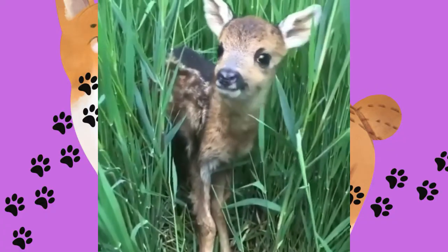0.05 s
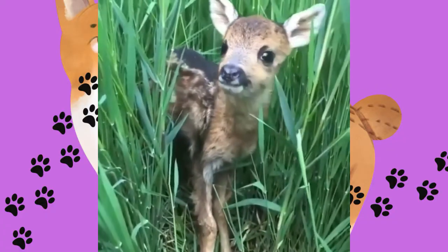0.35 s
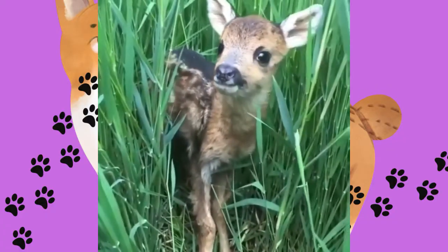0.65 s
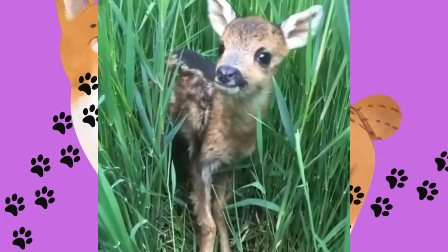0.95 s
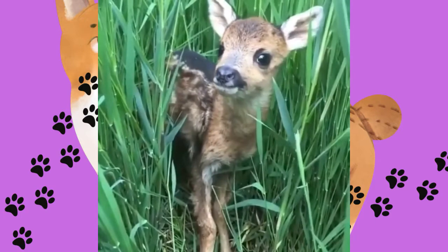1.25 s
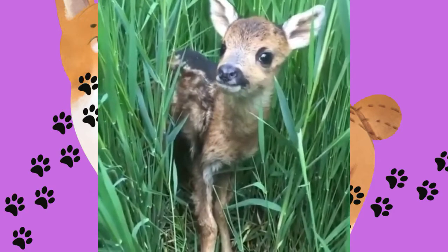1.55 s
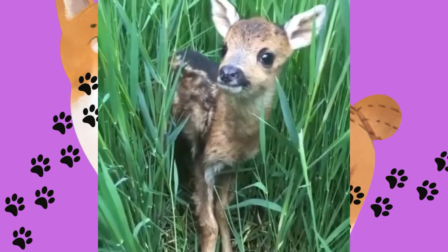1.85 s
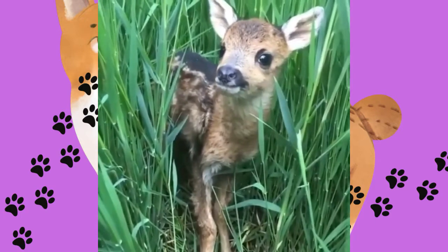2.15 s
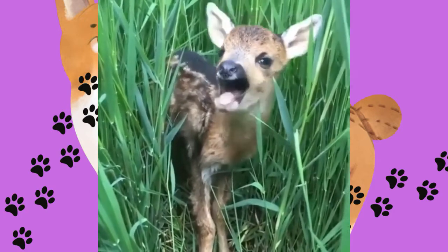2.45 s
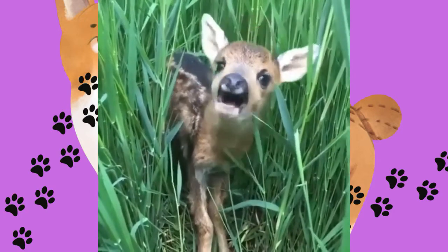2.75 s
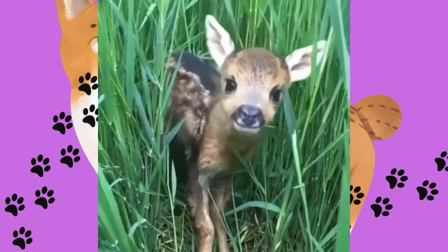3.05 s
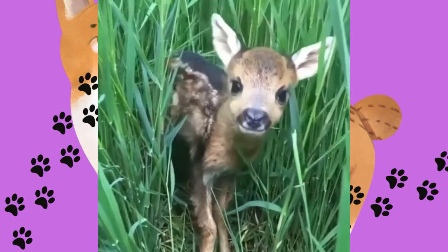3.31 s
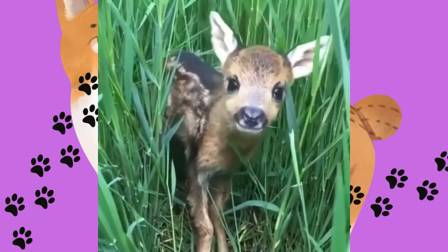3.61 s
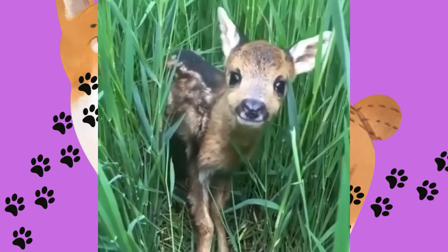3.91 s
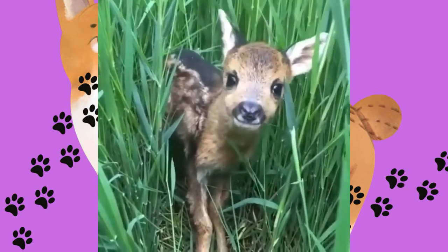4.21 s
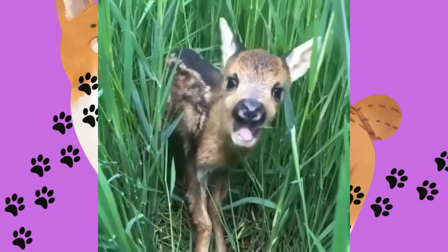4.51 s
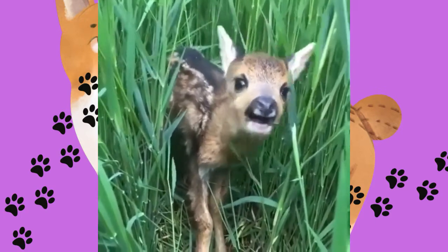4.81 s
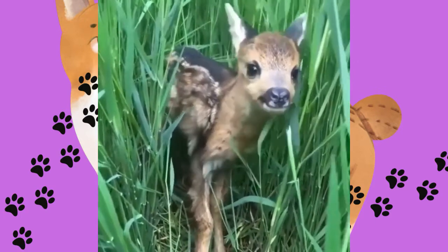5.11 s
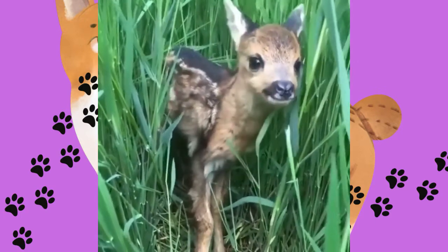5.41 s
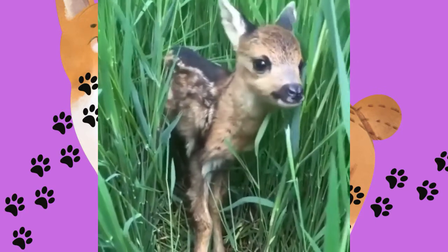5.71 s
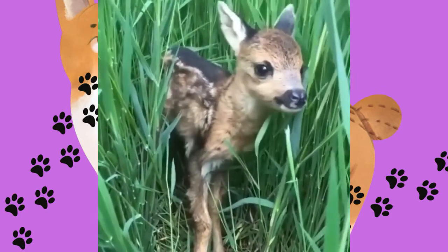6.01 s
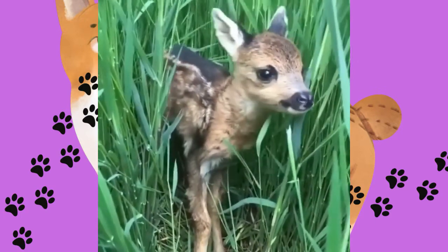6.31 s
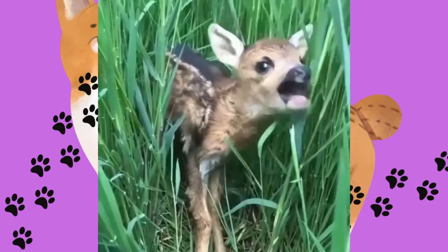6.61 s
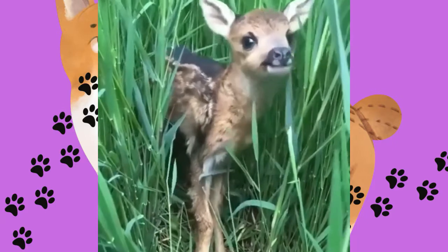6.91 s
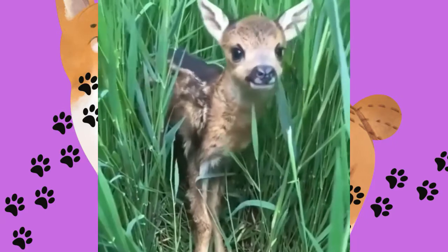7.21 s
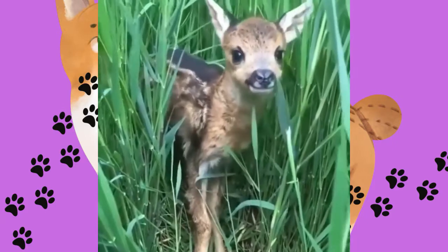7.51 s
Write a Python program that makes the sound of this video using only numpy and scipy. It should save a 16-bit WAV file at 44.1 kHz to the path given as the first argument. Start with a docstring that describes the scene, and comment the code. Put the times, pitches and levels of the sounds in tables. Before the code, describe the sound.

Three thin, piercing bleats from a young deer close by, each breaking into a rasp, with faint outdoor hiss behind.

```python
"""Low outdoor rumble and hiss open the scene; a far bird chirps once and others peep faintly.
From 2.3 s a fawn in tall grass, close by, gives three thin bleats: vocal folds sounding through
its throat. Each starts as a soft squeak, opens into a clear arch of pitch, then drops an octave into
a rasp and croaks shut. Steady, piercing high tones sound during the bleats; the background ducks and
creeps back. After the first bleat the grass keeps stirring; after the last, rumble and hiss swell."""
import sys
import numpy as np
from scipy import signal
from scipy.fft import rfft, irfft, next_fast_len
from scipy.io import wavfile
from scipy.ndimage import uniform_filter1d, minimum_filter1d

SR = 44100
rng = np.random.default_rng(int(sys.argv[2]) if len(sys.argv) > 2 else 0)


def persist_wave(psi):
    """Save psi, clipped to +-1, as 16-bit WAV."""
    counts = np.round(np.clip(psi, -1, 1) * 32767).astype(np.int16)
    wavfile.write(sys.argv[1], SR, np.atleast_2d(counts).T)


N = 341775
TIME = np.arange(N) / SR

# colour of the low outdoor rumble: f/Hz, level/dB
RUMBLE_COLOUR = [(12, -47), (20, -20.5), (47, -1), (70, 2), (95, -4), (167, -13), (212, -14.5), (263, -23),
                 (350, -32.5), (460, -53.5), (770, -120)]
# colour of the hiss of air and grass: f/Hz, level/dB
HISS_COLOUR = [(180, -29.5), (300, -2.5), (420, -7), (999, -2), (1690, -13), (2710, -16.5), (4800, -22),
               (6160, -20), (7680, -21.5), (10000, -36.5), (13000, -68.5), (22000, -120)]
# swells of rumble and hiss: t/s, added share/dB, half-width/s
AIR_SWELLS = [(4.2, -11.5, .4), (7.195, -1, .45)]
# brushes of grass: t/s, level/dB, half-width/s
GRASS_BRUSHES = [(1.698, -81, .06), (3.444, -71, 0.059), (3.96, -86, 0.32), (5.83, -83, 0.12)]
# colour of rustling grass: f/Hz, level/dB
GRASS_COLOUR = [(1000, -12.5), (2500, -6), (4000, -4.5), (5800, -3), (7200, -6.5), (9000, -8), (10000, -29)]
# peeps of the farthest birds: t/s, f/Hz, level/dB, half-width/s
FAR_PEEPS = [(.38, 2880, -73.5, .016), (.888, 2780, -74.5, 0.0076), (1.01, 2830, -73, 0.014),
             (1.386, 2710, -73.5, 0.028), (1.916, 2780, -78, 0.027), (2.875, 2200, -53.5, 0.0084),
             (6.354, 2720, -71.5, 0.018)]
# notes of one bird's chirp: t/s, f/Hz, relative level/dB, half-width/s
CHIRP_NOTES = [(0.408, 6800, -62.5, 0.026), (.423, 6940, -46.5, 0.0018), (.458, 6470, -53, 0.022),
               (0.5, 7500, -63, 0.011)]
# steady, piercing high tones that sound during the bleats:
# start/s, fade from/s, stop/s, f/Hz, level/dB, fade by the stop/dB
STEADY_HIGH_TONES = [ (2.388, 2.410, 2.412, 6718, -20, 0), (2.412, 2.434, 2.482, 6718, -14, -22),
                     (4.502, 4.660, 4.735, 7063, -14.5, -11), (4.502, 4.518, 4.525, 9819, -28, -2),
                     (4.590, 4.780, 4.830, 9819, -56, 0), (4.765, 4.810, 4.825, 7063, -37, -3),
                     (6.462, 6.670, 6.765, 9130, -24, -20), (6.480, 6.720, 6.780, 9819, -47, -3),
                     (6.493, 6.590, 6.688, 7063, -14.5, -8)]
# last catches of the voice as the throat closes: t/s, level/dB, decay/s
THROAT_CATCHES = [(2.806, -34.5, 0.0091), (4.842, -40, 0.0095), (4.857, -35, 0.0078), (6.785, -32, .008),
                  (6.801, -29.5, .003), (6.812, -28, 0.0053)]
# colour of the air in a catch: f/Hz, level/dB
CATCH_COLOUR = [(150, -27), (500, -11.5), (850, 6), (1300, -3), (1900, 8), (2800, -13.5), (4500, -13.5),
                (9000, -18.5)]
# throat resonances rung by a catch: f/Hz, relative level/dB
CATCH_MODES = [(900, -8), (1920, -4)]
# how throat and mouth shape the harmonics: f/Hz, gain/dB
THROAT_GAIN = [(800, -9), (1300, -3.5), (1750, 1), (1920, 4), (2600, -2), (3050, -2.5), (3550, -5),
               (3950, 10.5), (4400, 3.5), (4700, -2.5), (5350, -1), (5800, -3.5), (6250, 5.5), (6550, 6)]
# colour of the faint turbulence in the clear voice: f/Hz, level/dB
BREATH_COLOUR = [(200, -17.5), (900, -19), (1500, -7), (2300, -25.5), (2750, -10), (3700, -12), (4400, -2),
                 (5900, -11), (6400, 0.5), (7200, 7), (8100, -33.5), (8900, -7), (10000, -23.5)]
# colour of the rasp as the voice breaks: f/Hz, level/dB
RASP_COLOUR = [(200, -35), (700, -36), (1100, -11), (1800, -15.5), (2600, -6.5), (3400, -10.5),
               (4100, -1.5), (5200, -13), (6400, 1.5), (7400, -13), (8200, 1), (9200, 3.5), (10000, -14)]
# the bleats: start/s, mouth opens/s, effort fades from/s, voice breaks/s, end/s, top pitch/Hz, rise/s,
# sag/(Hz/s), level trim/dB, fundamental's loss by the break/dB, rasp trim/dB,
# lower and upper gliding tone against the overtones/dB
FAWN_BLEATS = [(2.32, 2.367, 2.500, 2.729, 2.827, 1796, .174, 598, 0.25, -13, -0.5, 0, -26),
               (4.437, 4.467, 4.605, 4.774, 4.876, 1786, .114, 484, -0.5, -14.5, -1.5, -17.5, -16.5),
               (6.411, 6.442, 6.585, 6.711, 6.810, 1780, 0.13, 416, 0, -11.5, 1, -18.5, -29.5)]

BREAK_S, RELEASE_S = .0139, .027   # time constant of the octave drop; time the throat takes to close


def from_db(db):
    """Decibels to gain."""
    return 10 ** (np.asarray(db) / 20)


def rms_one(x):
    """Scale to unit power."""
    return x / np.sqrt(np.mean(x ** 2) + 1e-20)


def at_hz(points, hz):
    """Gain of a colour curve at the given frequencies."""
    f, db = np.transpose(points)
    return from_db(np.interp(np.log(hz + 1e-9), np.log(f), db))


def noise(colour, size=N, gate=1):
    """Noise, gated at its source and then coloured, rms 1."""
    padded = next_fast_len(size)
    hz = np.arange(padded // 2 + 1) * SR / padded
    spectrum = rfft(gate * rng.standard_normal(size), padded)
    return rms_one(irfft(spectrum * at_hz(colour, hz), padded)[:size])


def drift(rate_hz, size=N):
    """Smooth random wobble up to a given rate, rms 1."""
    sos = signal.butter(2, min(rate_hz, SR / 4), fs=SR, output="sos")
    return rms_one(signal.sosfilt(sos, rng.standard_normal(size + SR))[SR:])


def phase_of(hz):
    """Running phase of a pitch curve."""
    return 2 * np.pi * np.cumsum(hz) / SR


def tone(phase):
    """Sine of rms 1 with a random starting phase."""
    return np.sqrt(2) * np.sin(phase + rng.uniform(0, 2 * np.pi))


def ramp(t, start, length):
    """Straight rise from 0 to 1."""
    return np.clip((t - start) / length, 0, 1)


def swell(peak_s, db, width_s, t=TIME):
    """A bell-shaped rise and fall in gain around one moment."""
    return from_db(db) * np.exp(-np.minimum(((t - peak_s) / width_s) ** 2, 50))


def scattered(x, t60, wet_db):
    """Vegetation adds a diffuse, dying tail."""
    tail = rng.standard_normal(SR) * from_db(-60 * TIME[:SR] / t60)
    tail /= np.sqrt(np.sum(tail ** 2))
    return x + from_db(wet_db) * signal.fftconvolve(x, tail)[:N]


def outdoor_bed(rumble_db=-52.5, hiss_db=-66, hum_db=-66, hum_hz=209):
    """Low rumble and a soft hiss of air and grass swell together over a far, wavering hum."""
    swells = 1 + sum(swell(*row) for row in AIR_SWELLS)
    rumble = from_db(rumble_db + 1.5 * drift(11)) * noise(RUMBLE_COLOUR)
    hiss = from_db(hiss_db) * noise(HISS_COLOUR)
    early_db = -7.5 * (1 - ramp(TIME, 3.38, .62))   # the hum is fainter at first
    hum = from_db(hum_db + early_db) * tone(phase_of(hum_hz + 3 * drift(3.8)))
    return swells * (rumble + hiss) + hum


def grass(stir_from_s=3.44, stir_db=-72, flicker_db=2):
    """Grass rustles in a few soft brushes and, partway through, starts to stir steadily."""
    stirring = from_db(stir_db) * ramp(TIME, stir_from_s, .18)
    brushes = sum(swell(*row) for row in GRASS_BRUSHES)
    return (stirring + brushes) * from_db(flicker_db * drift(25)) * noise(GRASS_COLOUR)


def far_peeps(warble_hz=60):
    """The farthest birds give faint, warbling blips."""
    warble = warble_hz * drift(112)
    return sum(swell(s, db, width) * tone(phase_of(hz + warble)) for s, hz, db, width in FAR_PEEPS)


def bird_chirp(warble_hz=380, trim_db=-2):
    """One high chirp, made buzzy by a fast warble and blurred by distance."""
    warble = warble_hz * drift(590)
    chirp = sum(swell(s, db + trim_db, width) * tone(phase_of(hz + warble))
                for s, hz, db, width in CHIRP_NOTES)
    return scattered(chirp, t60=.51, wet_db=-.5)


def ducking(foreground, threshold_db=-27, depth_db=13, hold_s=.3, release_db_per_s=22):
    """Background gain that drops while the foreground is loud, holds, then creeps back."""
    level_db = 10 * np.log10(np.abs(uniform_filter1d(foreground ** 2, size=441)) + 1e-12)
    cut_db = np.clip(level_db - threshold_db, 0, depth_db)
    half = int(hold_s * SR / 2)
    held_db = -minimum_filter1d(-cut_db, 2 * half + 1, origin=half)
    recovery_db = release_db_per_s * TIME
    return from_db(recovery_db - np.maximum.accumulate(held_db + recovery_db))


def steady_high_tones(edge_s=.0052, waver_db=1):
    """Piercing tones of steady pitch that snap in, hold and fade."""
    out = np.zeros(N)
    for start, fades, stop, hz, level_db, fade_db in STEADY_HIGH_TONES:
        gate = np.clip(np.minimum(TIME - start, stop - TIME) / edge_s + .5, 0, 1)
        on = gate > 0
        edges = np.sin(gate[on] * np.pi / 2) ** 2
        level = from_db(level_db + fade_db * np.interp(TIME[on], [fades, stop], [0, 1]))
        out[on] += edges * level * np.sqrt(2) * np.sin(2 * np.pi * hz * TIME[on])
    return out * from_db(waver_db * drift(37))


def croaks(air_db=-4):
    """Each catch of the voice is a short burst of air that sets the throat ringing."""
    out = np.zeros(N)
    air = from_db(air_db) * noise(CATCH_COLOUR)
    for s, db, decay in THROAT_CATCHES:
        on = (TIME >= s) & (TIME < s + 10 * decay)
        age = TIME[on] - s
        ring = sum(from_db(mode_db) * np.sin(2 * np.pi * hz * age) for hz, mode_db in CATCH_MODES)
        out[on] += from_db(db) * np.exp(-age / decay) * (ring + air[on])
    return out


def gliding_tones(t, moments, phase, rough, lower_db, upper_db, shift_hz=5512):
    """Thin tones ride above the first three harmonics; the third comes in with roughness."""
    _, opens, _, breaks, _ = moments
    # the lower tone swells in and leaves just ahead of the break
    lower = from_db(lower_db - 20.5 * (1 - ramp(t, opens, .09)))
    lower /= 1 + np.exp((t - breaks) / BREAK_S + 2)
    # the upper pair flares at the opening and at the break
    upper = from_db(upper_db) + swell(opens + .011, -8, .0053, t) + swell(breaks, -9, .022, t)
    first, second, third = (tone(k * phase + 2 * np.pi * shift_hz * t) for k in (1, 2, 3))
    return lower * first + upper * (second + rough * third)


def turbulence(phase, harsh, pulsing=.18, breath_db=-2):
    """Air puffs once for each opening of the folds; breath broadens into rasp as the voice harshens."""
    puffs = 1 + pulsing * np.cos(phase)
    rasp = noise(RASP_COLOUR, len(phase), puffs)
    breath = from_db(breath_db) * noise(BREATH_COLOUR, len(phase), puffs)
    return np.sqrt(harsh) * rasp + np.sqrt(1 - harsh) * breath


def bleat_pitch(t, moments, top_hz, rise_s, sag_hz_per_s,
                squeak_hz=1880, fall_hz=448, climb_hz=282, broken_hz=908):
    """A falling squeak, a climb to the top, a slow sag, then a break to the octave below."""
    start, opens, _, breaks, end = moments
    squeak = squeak_hz - fall_hz * np.sqrt(ramp(t, start, opens - start))
    to_top = opens + rise_s - t
    still_to_climb = climb_hz * (np.maximum(to_top, 0) / rise_s) ** 2.37
    arch = top_hz - still_to_climb + sag_hz_per_s * np.minimum(to_top, 0)
    held = (1 + np.exp((t - breaks) / BREAK_S)) ** -.95
    broken = broken_hz * (1 - .34 * ramp(t, end - RELEASE_S, RELEASE_S))   # droops as the throat closes
    return held * np.maximum(squeak, arch) + (1 - held) * broken


def bleat_levels(t, moments, trim_db, loss_db, rasp_trim_db, attack_s, opening_s=.009, shut_db=-34.5):
    """Fundamental, overtones and rasp in dB: soft until the mouth opens, then following the effort."""
    start, opens, fades, breaks, end = moments
    opened = ramp(t, opens - opening_s, opening_s)
    shut = 1 - ramp(t, start - attack_s / 2, attack_s) + ramp(t, end - RELEASE_S, RELEASE_S)
    spent = ramp(t, fades, breaks - fades)
    before_break, after_break = np.maximum(breaks - t, 0), np.maximum(t - breaks, 0)
    # a 1 dB push opens the call, then the level dips briefly
    push_s = opens + .012
    effort_db = trim_db + swell(push_s, 0, .013, t) - 2.5 * swell(opens + .035, 0, .038, t)
    first_db = -21.5 + effort_db + loss_db * spent
    over_db = -19 + effort_db - 7 * spent - 370 * after_break
    # a burst of rasp clears to faint grit; a second burst peaks at the break
    opening_rasp_db = np.maximum(-34.5 - 190.5 * np.abs(t - push_s), -48.5)
    break_rasp_db = -29.5 - 202.5 * before_break
    rasp_db = rasp_trim_db + np.maximum(opening_rasp_db, break_rasp_db) - 310.5 * after_break
    # each layer crossfades from its growing squeak level to its open-mouth level
    growth_db = 161 * (t - opens)
    return [(1 - opened) * (squeak_db + growth_db) + opened * open_db + shut_db * shut
            for squeak_db, open_db in ((-33, first_db), (-58, over_db), (-50, rasp_db))]


def bleat(row, attack_s=.008, waver_hz=32, jitter=.026, shimmer=.35, jitter_hz=300,
          harsh_from=.19, lag_s=.0035, ceiling_hz=6580):
    """Vocal folds sound through the throat; they grow unsteady as the rasp nears the voice's level."""
    *moments, top_hz, rise_s, sag_hz_per_s, trim_db, loss_db, rasp_trim_db, lower_db, upper_db = row
    start, _, fades, breaks, end = moments
    span = (TIME >= start - attack_s / 2) & (TIME <= end)
    t = TIME[span]
    size = len(t)
    pitch = bleat_pitch(t, moments, top_hz, rise_s, sag_hz_per_s) * (1 + .0007 * drift(waver_hz, size))
    wavering_db = trim_db + .8 * drift(waver_hz, size)
    first_db, over_db, rasp_db = bleat_levels(t, moments, wavering_db, loss_db, rasp_trim_db, attack_s)
    rough = np.minimum(from_db(rasp_db - np.maximum(first_db, over_db)), 1)
    harsh = rough ** 6 / (rough ** 6 + harsh_from ** 6)   # soft switch from clear to raspy
    unsteady = np.sqrt(rough * harsh)
    phase = phase_of(pitch * (1 + jitter * unsteady * drift(jitter_hz, size)))
    # softly closing folds lose their highest harmonics first; fading effort dulls them further
    tilt_db = .3 * np.minimum(over_db - first_db, 0)
    dull_db = -2.5 * ramp(t, fades, breaks - fades)
    voice = 0
    for k in range(1, 8):
        # each overtone opens a little after the one below
        late_db = np.minimum(over_db, np.interp(t - (k - 2) * lag_s, t, over_db))
        harmonic_db = first_db if k == 1 else late_db + (k - 3.5) * tilt_db + (k - 1.5) * dull_db
        below_ceiling = np.clip((ceiling_hz - k * pitch) / 100, 0, 1)
        level = from_db(harmonic_db) * at_hz(THROAT_GAIN, k * pitch) * below_ceiling
        voice += level * tone(k * phase) * (1 + shimmer * unsteady * drift(jitter_hz, size))
    glides = gliding_tones(t, moments, phase, rough, lower_db, upper_db)
    voice += from_db(over_db) * glides * (1 + .98 * rough * drift(jitter_hz, size))
    rasp = from_db(rasp_db + 4) * turbulence(phase, harsh)
    # the breaking voice creaks: tone and rasp flutter together
    creak = from_db(.5 * harsh * drift(160, size))
    out = np.zeros(N)
    out[span] = (voice + rasp) * creak
    return out


def scene():
    """The almost dry fawn and the steady high tones up front, with the outdoors ducking under them."""
    throat = sum(bleat(row) for row in FAWN_BLEATS) + croaks()
    foreground = scattered(throat, t60=.95, wet_db=-51.5) + steady_high_tones()
    outdoors = outdoor_bed() + bird_chirp() + far_peeps() + grass()
    return (foreground + ducking(foreground) * outdoors)[None]


def record(dry, low_cut_hz=34, high_cut_hz=10000):
    """The small microphone drops the deepest bass; the top is cut steeply."""
    thin = signal.sosfilt(signal.butter(2, low_cut_hz, "high", fs=SR, output="sos"), dry)
    return signal.sosfilt(signal.ellip(12, .1, 85, high_cut_hz, fs=SR, output="sos"), thin)


dry = scene()
out = record(dry)
persist_wave(out)
```